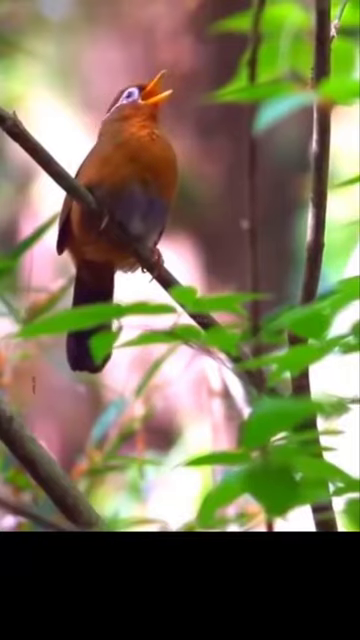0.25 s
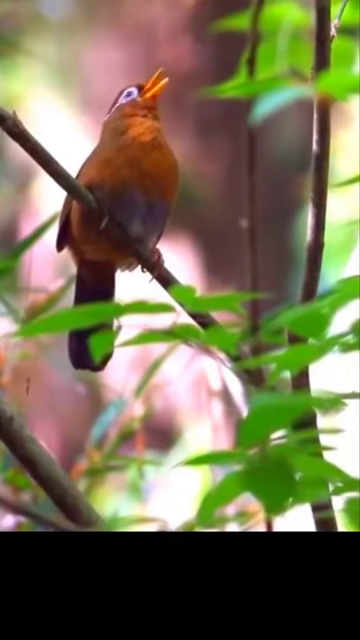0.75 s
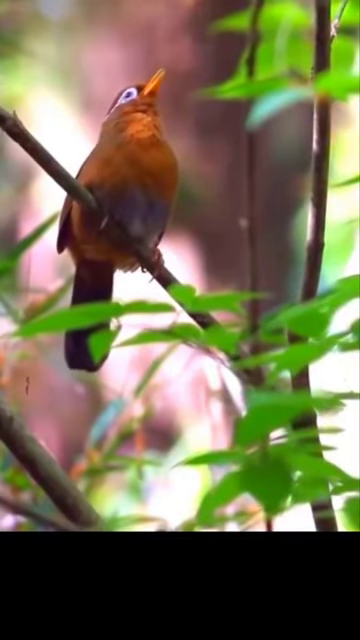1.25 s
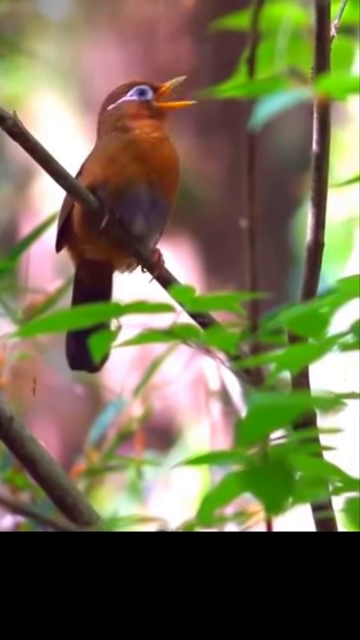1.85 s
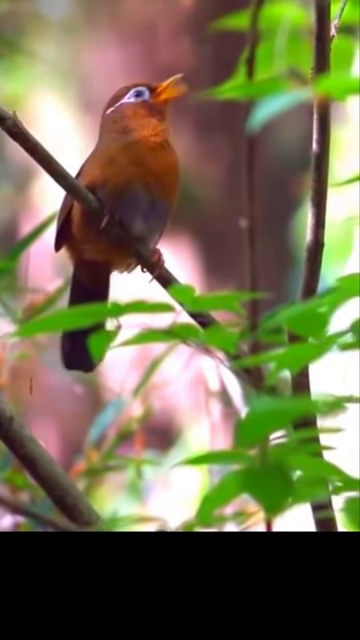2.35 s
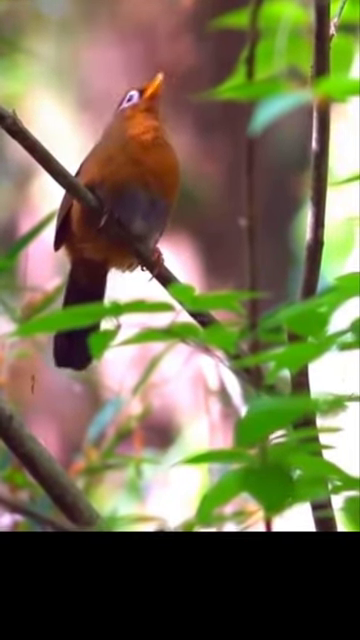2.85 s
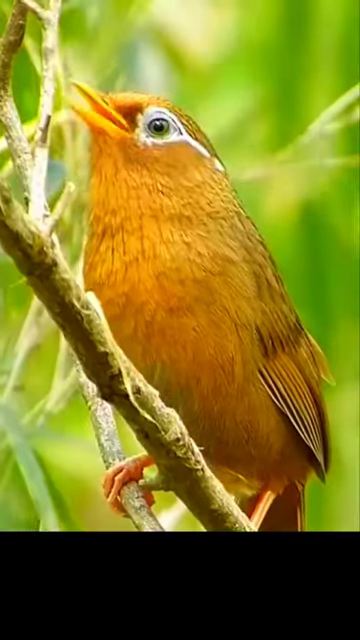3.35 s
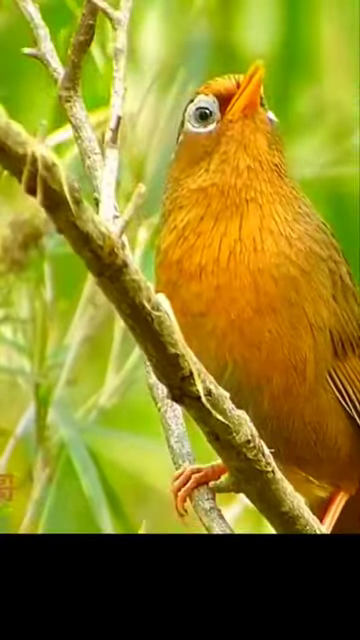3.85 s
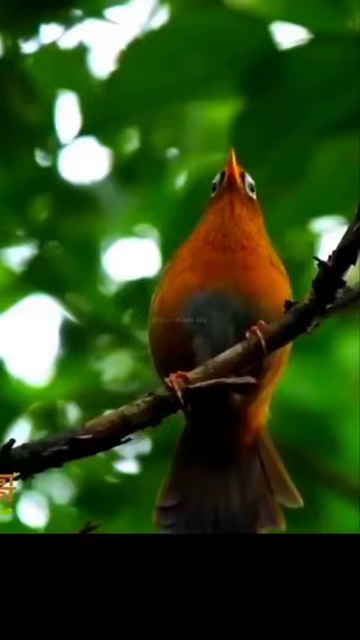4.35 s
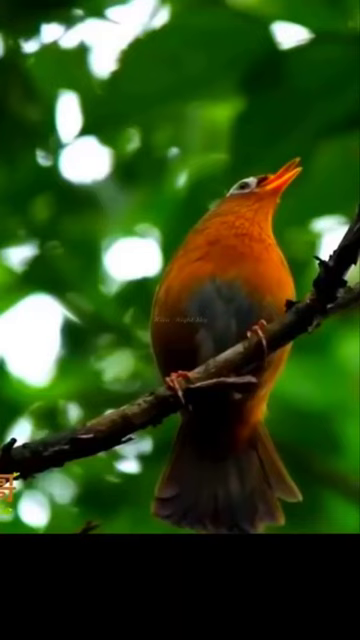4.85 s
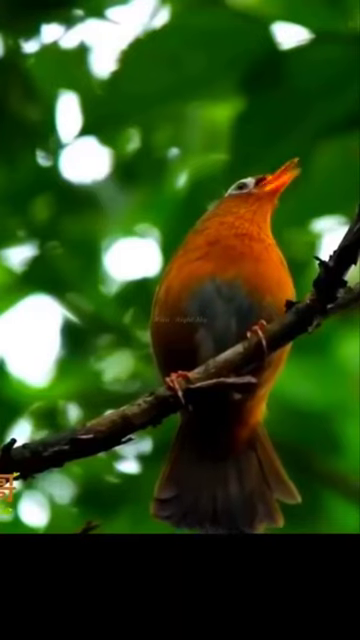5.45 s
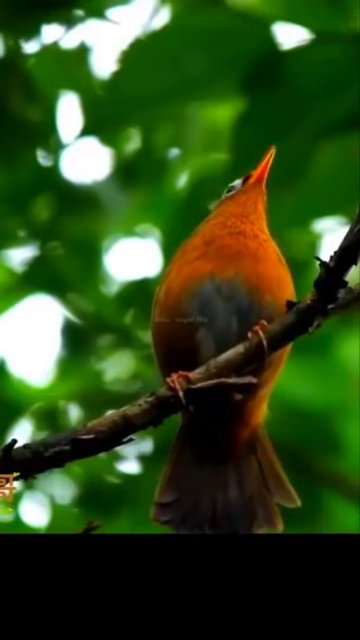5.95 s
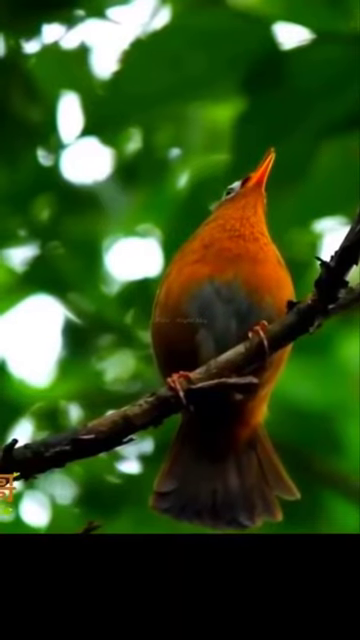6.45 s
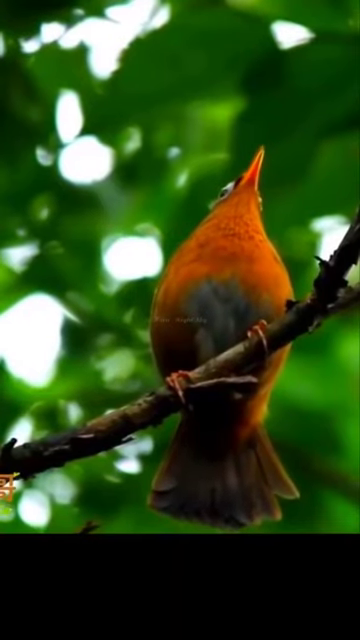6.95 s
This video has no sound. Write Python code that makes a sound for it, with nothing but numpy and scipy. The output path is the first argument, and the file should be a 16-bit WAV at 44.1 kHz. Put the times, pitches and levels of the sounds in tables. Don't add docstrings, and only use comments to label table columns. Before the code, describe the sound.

A songbird in echoing woodland blows pairs of clear whistles that scoop up and flick shut, some capped by a high fluttering note. Two fainter rough calls follow from deeper in the wood, cut off into near silence. Then come three arched whistles, two quick runs of chirps, each ending in a low buzz. Thin filtered air hiss and soft wind bumps sit underneath.

```python
import sys
import numpy as np
from scipy import signal
from scipy.fft import rfft, irfft
from scipy.io import wavfile
from scipy.ndimage import uniform_filter1d

SR = 44100
rng = np.random.default_rng(int(sys.argv[2]) if len(sys.argv) > 2 else 0)


def gain_from_decibels(decibels):
    exponent = np.asarray(decibels, float) / 20
    return 10 ** exponent


def store_pcm(level_fs):
    pcm = np.round(np.clip(level_fs, -1, 1) * 32767).astype(np.int16)
    wavfile.write(sys.argv[1], SR, np.atleast_2d(pcm).T)


N = 317079

# (frequency [Hz], level [dB])
THROAT = [(1500, 11), (2400, 2), (3200, 32.5), (3900, 14.5), (4800, -8.5), (6500, -3.5), (9000, -2),
          (15000, 0.5)]


def voice(rows, partials, flutter=(1, 1, 0, 0), breath_db=-46, scoop_hz=0, beak_hz=4450,
          widen_s=1e-4, crack_hz=9000):
    t = np.arange(max(rows[0][0], 0), rows[-1][0], 1 / SR)
    count = len(t)
    hz, level_db = curves(rows, t)
    hz = uniform_filter1d(hz, size=120, mode="nearest")

    hoarse = np.clip(np.maximum(scoop_hz - hz, hz - crack_hz) / 200, 0, 1)
    hz = hz + 14 * wander(count, size=60) + 210 * hoarse * wander(count, size=35)

    first_rate, last_rate, first_swing, last_swing = flutter
    along = (t - t[0]) / (t[-1] - t[0])
    rate = (first_rate + along * (last_rate - first_rate)) * (1 + .16 * wander(count, size=250))
    swing = (first_swing + along * (last_swing - first_swing)) * (1 + .12 * wander(count, size=200))
    swing = swing * np.minimum((t - t[0]) / widen_s, 1)
    beat = np.sin(2 * np.pi * np.cumsum(rate) / SR)
    hz = hz + swing * (beat - .3)

    level_db = level_db - np.clip(hz - beak_hz, 0, 900) / 25
    level_db = level_db - 5 * np.clip((scoop_hz + 110 - hz) / 40, 0, 1)
    level_db = level_db + swing / 300 * (beat + wander(count, size=50))
    bright_db = .35 * (level_db + 20) + swing / 200 * beat

    turn = 2 * np.pi * np.cumsum(hz) / SR
    tone = 0
    for k, db in partials:
        overtone_db = bright_db + read(THROAT, k * hz) + 5 * wander(count, size=160)
        lift_db = (k != 1) * overtone_db
        tone = tone + gain_from_decibels(db + lift_db) * (k * hz < 15500) * np.cos(k * turn)
    high_pass = signal.butter(4, 4500, "high", fs=SR, output="sos")
    breath = gain_from_decibels(breath_db + bright_db) * signal.sosfilt(high_pass, rng.standard_normal(count))
    edge = np.clip(np.minimum(t - t[0], t[-1] - t) / .007, 0, 1) ** 2
    return t[0], np.sqrt(2) * gain_from_decibels(level_db) * (tone + breath) * edge


# (share of the scoop [0-1], pitch [Hz], level [dB])
SCOOP = [(0, 1756, -16), (.4, 1800, -7), (.62, 2075, -2), (.8, 2287, -5), (.93, 2370, -11.5)]
LAND_HZ = 2403.4


def riser_line(land, scoop, hold, end_hz, db, flick_hz, depth):
    end = land + hold
    swell_db = -2 + 0.0296 * (end_hz - LAND_HZ)
    shut_hz = flick_hz + 0.46 * (flick_hz - end_hz)
    rows = [(land - scoop * (1 - a), LAND_HZ + depth * (hz - LAND_HZ), db + d) for a, hz, d in SCOOP]
    return rows + [(land, LAND_HZ, db), (end, end_hz, db + swell_db),
                   (end + 0.019, flick_hz, db + 1.5), (end + .03, shut_hz, db - 11)]


# (full voice lands [s], scoop before it [s], hold [s], pitch at end of hold [Hz], level [dB])
RISERS = [
    (.036, 0.097, .062, 2512, -25.5),
    (0.232, 0.058, 0.079, 2544, -21.5),
    (0.747, .077, .106, 2530, -21.5),
    (0.974, 0.056, 0.099, 2642, -22),
    (1.525, 0.095, 0.12, 2397, -25),
    (1.784, .056, .117, 2494, -21.5),
    (2.429, 0.11, 0.09, 2500, -23),
    (2.717, 0.1, 0.12, 2500, -22.5),
]
# (multiple of the pitch [1], level [dB])
RISER_PARTIALS = [(1, 0.5), (1.5, -60), (2, -35), (3, -35), (4, -61), (5, -51.5)]


def risers(out):
    for k, row in enumerate(RISERS):
        flick_hz = 2600 if k == len(RISERS) - 1 else 2997
        depth = 0.54 ** (k % 2)
        add(out, *voice(riser_line(*row, flick_hz, depth), RISER_PARTIALS, breath_db=-50.0,
                        scoop_hz=2201, crack_hz=2850))


# (time [s], level [dB], length [s])
SNAPS = [
    (0.11, -51, 0.011),
    (0.331, -42, 0.021),
    (0.878, -43.5, 0.011),
    (1.096, -39, 0.0065),
    (1.657, -38.5, 0.0092),
    (1.93, -45.5, 0.015),
    (2.54, -38, 0.016),
    (2.881, -53.5, 0.00795),
    (3.544, -51.5, 0.018),
    (3.797, -49.5, 0.021),
]


def snaps(out):
    t = np.arange(-2000, 2000) / SR
    wide = signal.butter(2, [2800, 11000], "band", fs=SR, output="sos")
    throat = signal.butter(2, [2900, 3800], "band", fs=SR, output="sos")
    for s, db, length in SNAPS:
        puff = signal.sosfilt(wide, rng.standard_normal(len(t)))
        puff += gain_from_decibels(17.5) * signal.sosfilt(throat, puff)
        add(out, s + t[0], gain_from_decibels(db) * puff * np.exp(-2 * (t / length) ** 2))


def stretched(line, start, length, hz, db, depth):
    return [(start + a * length, hz * (1 + depth * (ratio - 1)), db + d) for a, ratio, d in line]


# (start [s], length [s], centre pitch [Hz], level [dB], depth of the line [1])
TRILLS = [
    (0.394, 0.24, 4210, -21.5, 0.92),
    (1.149, 0.23, 4234, -19, 0.69),
    (2.021, .233, 4240, -21.5, 0.64),
]
# (share of the length [0-1], pitch over centre [1], level [dB])
TRILL_LINE = [(0, 0.83, -11), (.08, 0.9, -7), (.22, 0.91, -4), (.4, 1.0, -2.5), (.74, .86, 0.54),
              (.88, .72, -3.5), (1, .6, -5.5)]
# (multiple of the pitch [1], level [dB])
TRILL_PARTIALS = [(1, 1.5), (1.5, -48.5), (2, -24), (3, -25.5), (4, -35), (5, -57)]


def trills(out):
    for row in TRILLS:
        add(out, *voice(stretched(TRILL_LINE, *row), TRILL_PARTIALS, (130.3, 110.24, 450, 200),
                        breath_db=-26.5))


# (time from the peak [s], plain pitch [Hz], added by the wobble [Hz], level [dB])
ARCH_LINE = [(-.115, 1605, -80.5, -25.5), (-.07, 1911, -59.5, -12), (-.032, 2600, 620.5, -1),
             (-.014, 2960, -20.5, -4.5), (0.0, 3008, 639, 2), (0.019, 2850, 100, -2),
             (.05, 3024, 319.5, -2.5), (.066, 2890, 62, 0.9)]


def arch_line(peak, fall, depth, db):
    rows = [(peak + s, hz + depth * more_hz, db + d) for s, hz, more_hz, d in ARCH_LINE]
    end, end_hz = peak + fall, 2370
    fade = end - .04
    fade_hz = np.interp(fade, [rows[-1][0], end], [rows[-1][1], end_hz])
    return rows + [(fade, fade_hz, db - 4), (end, end_hz, db - 9.5)]


# (peak [s], fall [s], depth of the wobble at the top [1], level [dB])
ARCHES = [
    (4.601, 0.19, .95, -23.5),
    (5.003, 0.21, .3, -20.5),
    (5.617, 0.25, 1.05, -20),
]
# (multiple of the pitch [1], level [dB])
ARCH_PARTIALS = [(1, -3), (1.5, -72), (2, -29.5), (3, -39), (4, -41.5), (5, -53.5)]


def arches(out):
    for row in ARCHES:
        depth, line = row[2], arch_line(*row)
        add(out, *voice(line, ARCH_PARTIALS, (21, 17, 25, 45), breath_db=-43))
        strand = [(s, 1.5 * hz, db - 7.5 / depth) for s, hz, db in line[:2]]
        add(out, *voice(strand, [(1, 0)]))


def chirp_line(start, climb, hold, top_hz, db):
    end = start + climb + hold
    end_hz = top_hz - 1800 * hold
    return [(start, 2700, db - 19.5), (start + 0.414 * climb, 2500, db - 8), (start + climb, top_hz, db),
            (end, end_hz, db - 4.5), (end + .012, end_hz - 160, db - 4.5 - 7)]


# (start [s], climb [s], hold [s], top pitch [Hz], level [dB])
CHIRPS = [
    (6.1, 0.044, 0.024, 2989, -22.5),
    (6.166, 0.052, 0.0079, 2816, -21),
    (6.243, 0.056, 0.0056, 3048, -21),
    (6.325, .038, 0.025, 2790, -21.5),
    (6.411, 0.041, .03, 2686, -22),
    (6.733, .046, 0.034, 2946, -23.5),
    (6.818, .058, 0.013, 2947, -21.5),
    (6.899, 0.015, 0.062, 2770, -24),
    (6.978, 0.015, .034, 2643, -22.5),
]
# (multiple of the pitch [1], level [dB])
CHIRP_PARTIALS = [(1, 0), (1.5, -61.5), (2, -26.5), (3, -26), (4, -36), (5, -47)]
DOUBLING_S, HALF_PARTIALS = 6.82, [(1.5, -49.5), (2.5, -39.5), (3.5, -39)]


def chirps(out):
    for row in CHIRPS:
        doubled = int(row[0] > DOUBLING_S)
        add(out, *voice(chirp_line(*row), CHIRP_PARTIALS + HALF_PARTIALS * doubled, breath_db=-58))


# (start [s], length [s], centre pitch [Hz], level [dB], depth of the line [1])
BUZZES = [
    (6.478, .142, 2437, -28, 1.1),
    (7.014, .15, 2370, -28.5, .7),
]
# (share of the length [0-1], pitch over centre [1], level [dB])
BUZZ_LINE = [(0, 1.1, -1.5), (.16, 1.02, 1.1), (.42, .99, -2), (.75, 1.02, -1.4), (1, 1.09, -7)]
# (multiple of the pitch [1], level [dB])
BUZZ_PARTIALS = [(1, 0.5), (2, -28.5), (3, -28.5), (4, -39), (5, -42.5), (6, -45)]


def buzzes(out):
    for row in BUZZES:
        add(out, *voice(stretched(BUZZ_LINE, *row), BUZZ_PARTIALS, (190, 180, 226.3, 218),
                        breath_db=-56, widen_s=.025))


KICKS_HZ = [4500, 4830, 5370, 5170]


def far_line(start, kick, gap, db):
    rest_hz, rest_db = 4050, db - 2
    rows = [(start, 2850, db - 14.5)]
    for k, hz in enumerate(KICKS_HZ):
        top = kick + k * gap
        rows += [(top - 0.00491, rest_hz, rest_db), (top, hz, db)]
    return rows + [(rows[-1][0] + gap / 2, (hz + rest_hz) / 2, rest_db)]


# (start [s], first kick [s], gap between kicks [s], level [dB])
FAR_CALLS = [
    (3.497, 3.528, .0203, -43),
    (3.748, 3.782, .014, -37.5),
]
# (multiple of the pitch [1], level [dB])
FAR_PARTIALS = [(1, 0), (.5, -10), (1.5, -8), (2, -7)]


def far_calls(out):
    for row in FAR_CALLS:
        add(out, *voice(far_line(*row), FAR_PARTIALS, (240, 260, 40, 140), breath_db=-13, beak_hz=5600))


def birds():
    out = np.zeros(N)
    for sing in (risers, snaps, trills, arches, chirps, buzzes, far_calls):
        sing(out)
    return out


# (start [s], end [s], near echo [dB], its t60 [s], far echo [dB], its t60 [s])
TAKES = [
    (0, 3.19, -5.5, 0.22, -9.5, 0.82),
    (3.246, 3.803, -4.5, 0.33, -10.5, .6),
    (4.435, 7.2, 0, 0.14, -9.5, 0.64),
]
# (frequency [Hz], level [dB])
ECHO_COLOUR = [(1000, 0), (4500, -2.5), (6000, -4.5), (15000, -2)]


def trunks():
    age = np.arange(SR) / SR
    colour = gain_from_decibels(read(ECHO_COLOUR, np.fft.rfftfreq(SR, 1 / SR)))
    tails = []
    for start, end, near_db, near_t60, far_db, far_t60 in TAKES:
        decay = gain_from_decibels(-60 * age / np.array([[near_t60], [far_t60]]))
        taps = rng.standard_normal((2, SR)) * decay * (age > .004)
        tail = gain_from_decibels([near_db, far_db]) @ (taps / np.linalg.norm(taps, axis=1, keepdims=True))
        tails.append(irfft(rfft(tail) * colour))
    return tails


def wood(x):
    t, out = np.arange(N) / SR, np.zeros(N)
    for (start, end, *_), tail in zip(TAKES, trunks()):
        inside = np.clip(np.minimum(t - start, end - t) / 0.0012, 0, 1)
        out += inside * (x + signal.fftconvolve(x * inside, tail)[:N])
    return out


# (time [s], wash bottom [Hz], wash top [Hz]), the wash being the band of the song
OPEN = [(0, 1466, 4660), (1.4, 1507, 4750), (2.25, 1598, 4750), (2.4, 1767, 4690), (3.2, 1700, 4500),
        (3.24, 1490, 4960), (5.2, 1450, 4734), (5.45, 1459, 3895), (6.28, 1560, 4000), (6.34, 1954, 3480)]


def filtered(x, gate_db=-88):
    hz, t, z = signal.stft(x, SR, nperseg=512, noverlap=384)
    hz = hz[:, None]
    bottom, top = curves(OPEN, t)
    held = uniform_filter1d(uniform_filter1d(abs(z) ** 2, size=14, axis=1), size=3, axis=0)
    held_db = 10 * np.log10(abs(held) + 1e-20)
    kept = np.where(hz > top, .5 + .5 * np.tanh((held_db - gate_db) / 1.5), 1)
    kept = kept * between(hz, bottom - 20, SR)
    return signal.istft(z * kept, SR, nperseg=512, noverlap=384)[1][:N]


# (start [s], end [s], first level [dB], last level [dB])
MIDDLE = [(0, 2.8, -49.5, -60.5), (2.6, 3.21, -57, -62), (3.245, 3.87, -67, -65.5),
          (4.435, 6.4, -58.5, -55), (6.4, 7.05, -52.5, -66)]


def middle_hiss():
    return bursts(MIDDLE) * hiss(lambda t, hz: between(hz, *curves(OPEN, t)) * gain_from_decibels(-.4 * hz / 1000),
                                 streak_db=4.5)


# (start [s], end [s], first level [dB], last level [dB])
UPPER = [(0, 2.4, -66, -66), (2.4, 4, -71, -71), (4.5, 6.5, -66, -70.5), (6.5, 7.2, -77.5, -67.5)]


def upper_hiss():
    return bursts(UPPER) * hiss(lambda t, hz: between(hz, 4800, 15600) * gain_from_decibels(-.3 * hz / 1000), streak_db=7)


# (start [s], end [s], first level [dB], last level [dB])
WASH = [(0, .36, -53, -83), (.42, 1.1, -59.5, -65), (1.1, 1.5, -70, -91), (2.29, 2.37, -79, -90),
        (2.93, 3.06, -79, -79), (3.245, 3.803, -61, -60.5), (4.435, 5.3, -55.5, -51.5),
        (5.3, 5.57, -47, -76), (5.68, 5.81, -75.5, -70), (5.95, 6.4, -91.5, -94)]
# (time [s], bottom [Hz], top [Hz])
WASH_EDGES = [(0, 875, 1420), (.39, 1086, 1300), (.42, 490, 1500), (1.15, 440, 1500), (1.45, 605, 1020),
              (2.25, 235, 450), (2.4, 245, 445), (2.9, 648, 935), (3.2, 654, 950), (3.24, 200, 1490),
              (5.2, 180, 1580), (5.3, 277, 1080), (5.45, 500, 790), (5.7, 600, 800)]


def low_wash():
    return bursts(WASH) * hiss(lambda t, hz: between(hz, *curves(WASH_EDGES, t)) * gain_from_decibels(-2.5 * hz / 1000))


# (start [s], end [s], first level [dB], last level [dB])
FRESH = [(3.245, 3.803, -60, -57.5), (4.435, 4.78, -66, -66.5), (4.78, 5.1, -68.5, -64)]
# (frequency [Hz], level per Hz [dB])
TOP = [(2710, -30), (4600, 3.5), (8340, 2.5), (12500, -22), (13700, -34), (14000, -49), (15500, -53)]


def fresh_hiss():
    return bursts(FRESH) * hiss(lambda t, hz: gain_from_decibels(read(TOP, hz)) * between(hz, 4200, 15700, 300) + 0 * t)


# (start [s], end [s], first level [dB], last level [dB])
GUSTS = [(0, .04, -66, -78), (.785, .94, -56, -59), (1.03, 1.11, -59, -59), (1.165, 1.27, -58, -60),
         (0, 3.19, -96, -100), (5.33, 7.19, -99, -101), (3.245, 3.803, -75, -75), (4.435, 5.33, -64, -63)]
# (frequency [Hz], level per Hz [dB])
RUMBLE = [(12, -43.5), (20, -14), (54, 2.5), (124, 2), (156, 2), (237, -27), (320, -32), (420, -73),
          (700, -120)]


def wind():
    return bursts(GUSTS, 0.042) * hiss(lambda t, hz: gain_from_decibels(read(RUMBLE, hz)) + 0 * t)


# (start [s], end [s], first level [dB], last level [dB])
SCRAPS = [
    [(3.81, 4.0, -45, -72.5), (4.0, 4.395, -74, -93)],
    [(3.81, 4.0, -71, -82), (4.0, 4.395, -67.5, -86.5)],
]
# (frequency [Hz], spread [Hz])
SCRAP_BANDS = [(2200, 180), (3750, 280)]


def scraps():
    bands = [hiss(lambda t, hz: np.exp(-.5 * ((hz - f) / w) ** 2) + 0 * t) for f, w in SCRAP_BANDS]
    return sum(bursts(rows, 0.0012) * band for rows, band in zip(SCRAPS, bands))


def hiss(shape, streak_db=0):
    t = np.arange(N // 256 + 5)[:, None] * 256 / SR
    hz = np.fft.rfftfreq(1024, 1 / SR)
    a, b, streaks = rng.standard_normal((3, len(t), 513))
    streaks = evened(uniform_filter1d(uniform_filter1d(streaks, size=70, axis=0), size=9, axis=1))
    size = shape(t, hz) * gain_from_decibels(streak_db * np.clip(streaks, -3, 1.2))
    size = size / np.linalg.norm(size, axis=1, keepdims=True)
    return evened(signal.istft(((a + 1j * b) * size).T, nperseg=1024, noverlap=768)[1][:N])


def bursts(rows, ramp=0.0022):
    t, level = np.arange(N) / SR, 0
    for start, end, first_db, last_db in rows:
        gate = np.clip(np.minimum(t - start, end - t) / ramp, 0, 1)
        level = level + gain_from_decibels(np.interp(t, [start, end], [first_db, last_db])) * gate
    return level


def between(hz, lo, hi, soft_hz=35):
    return .25 * (1 + np.tanh((hz - lo) / soft_hz)) * (1 + np.tanh((hi - hz) / soft_hz)) + 1e-5


def evened(x):
    return x / np.sqrt(np.mean(x ** 2) + 1e-20)


def wander(count, size):
    return evened(uniform_filter1d(uniform_filter1d(rng.standard_normal(count), size=size), size=size))


def read(points, hz):
    f, value = np.transpose(points)
    return np.interp(np.log(hz + 1), np.log(f + 1), value)


def curves(rows, t):
    s, *columns = np.transpose(rows)
    return [np.interp(t, s, c) for c in columns]


def add(mix, s, sound):
    part = mix[round(s * SR):][:len(sound)]
    part += sound[:len(part)]


def scene():
    song = filtered(wood(birds()) + middle_hiss() + upper_hiss())
    free_air = wind() + fresh_hiss() + low_wash()
    return (song + free_air + scraps())[None]


def roll_off(x):
    return signal.sosfilt(signal.butter(12, 15670, fs=SR, output="sos"), x)


def record(dry):
    mix = dry + gain_from_decibels(-102) * rng.standard_normal(dry.shape)
    return roll_off(mix)


dry = scene()
out = record(dry)
store_pcm(out)
```